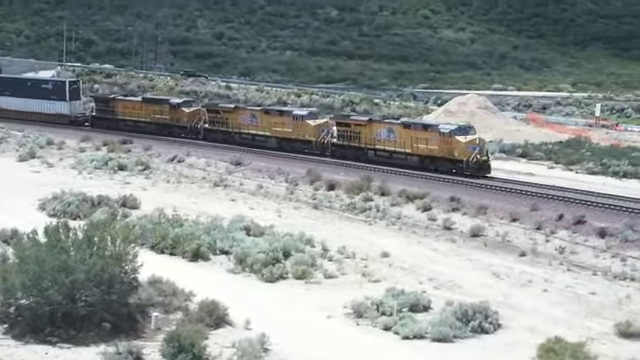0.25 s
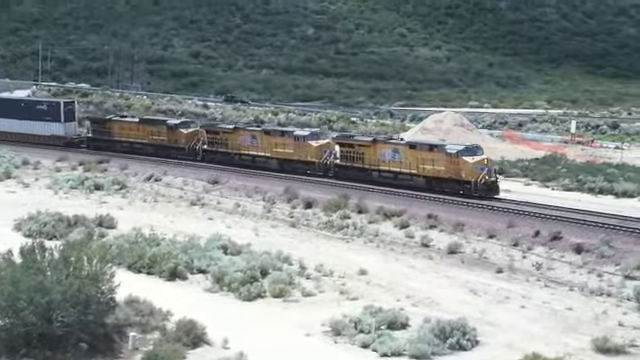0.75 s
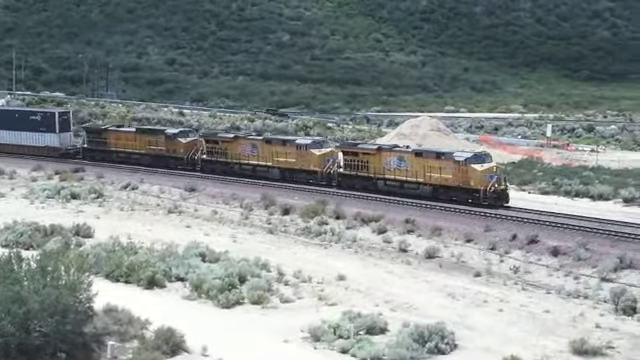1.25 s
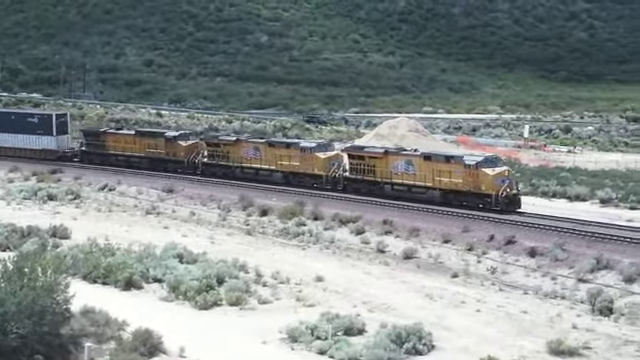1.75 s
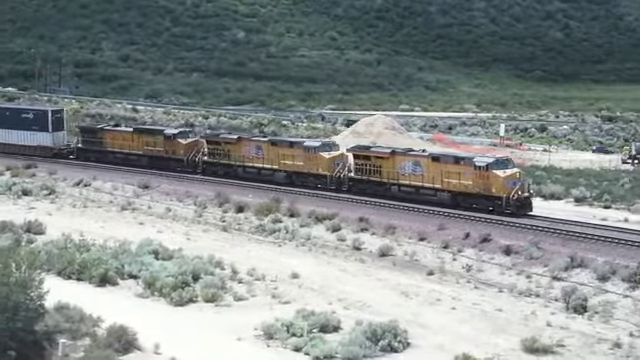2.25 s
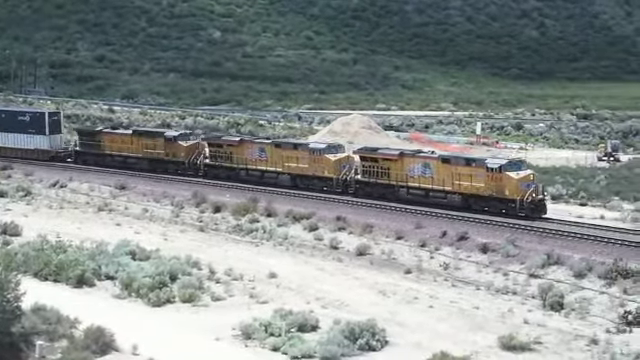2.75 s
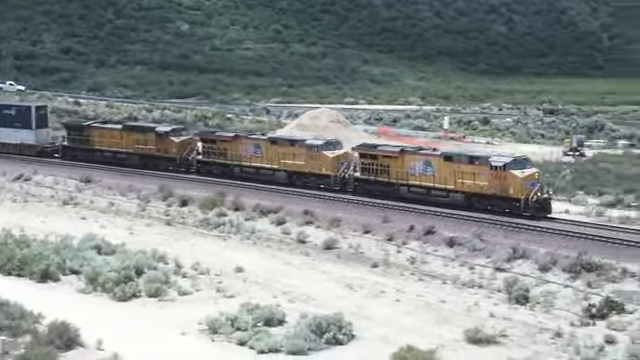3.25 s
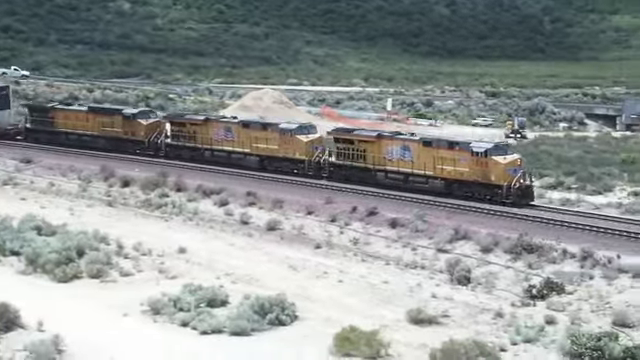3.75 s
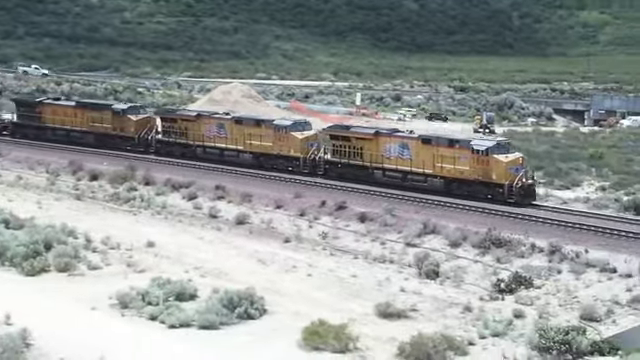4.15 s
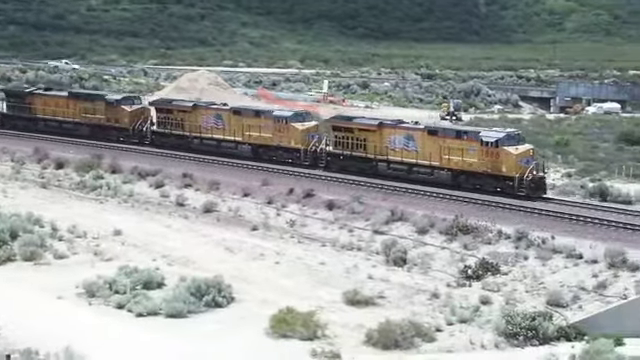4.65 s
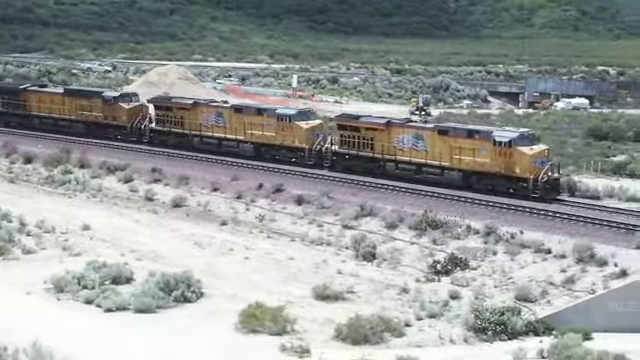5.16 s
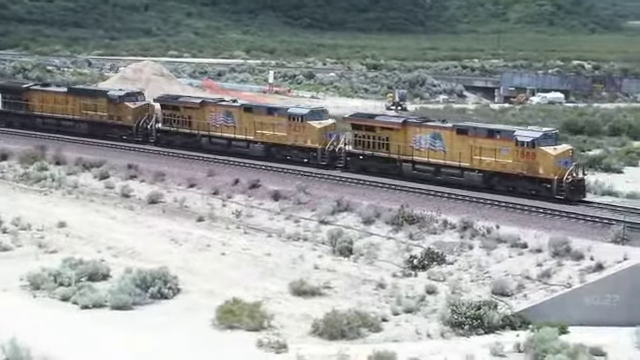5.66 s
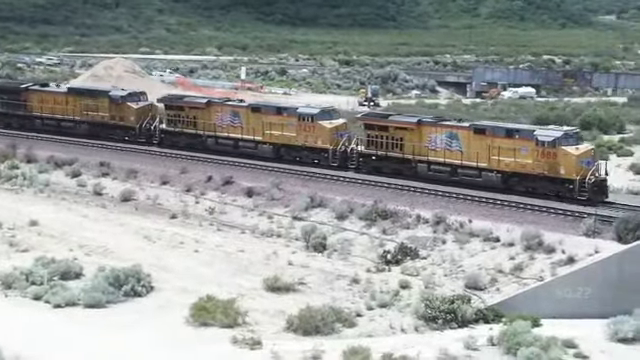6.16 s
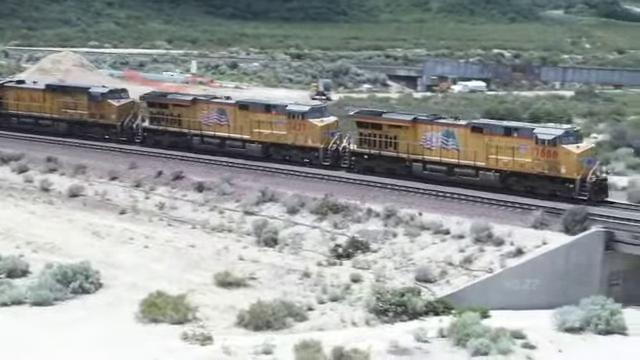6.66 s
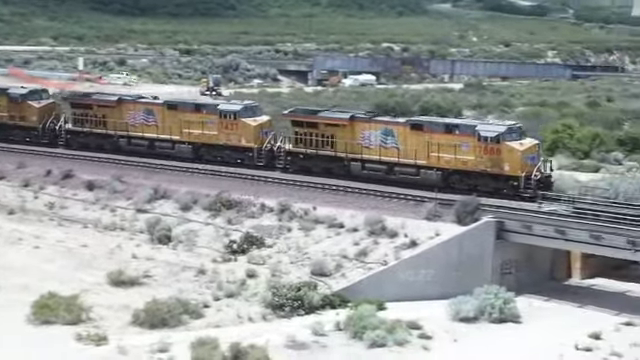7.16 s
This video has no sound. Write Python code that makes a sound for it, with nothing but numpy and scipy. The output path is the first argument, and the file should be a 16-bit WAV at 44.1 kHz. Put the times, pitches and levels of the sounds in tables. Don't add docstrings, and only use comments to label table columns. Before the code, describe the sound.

From a windy open hillside, diesel locomotives work at full throttle, roughly 150 metres away and slowly closing. At 0 s the train is held low beneath strong wind rumble and small port slaps; its low, steady buzzing drone, broad exhaust roar and grainy fan and rail hiss rise by about 1.7-2 s. Hard wind slaps strike near 1.1 and 2.6 s, and heavy gusts at 3.2-3.5 s, each making the train dip and recover. Around 3.6 s one engine's drone gives way to a stronger, throbbing second one; the roar carries best near 4.4 s, and the hum is fullest around 5-6 s. A sharp slap hits at 5.2 s. Wind then eases somewhat, with another flurry near 6.9 s. Thin unsteady fan and turbo whines shimmer above. Gusts are stronger on the left, and the engines continue through the end at about 7.4 s.

```python
import sys
import numpy as np
from scipy import signal
from scipy.fft import rfft, irfft
from scipy.io import wavfile

SR = 44100
rng = np.random.default_rng(int(sys.argv[2]) if len(sys.argv) > 2 else 0)


def log_audio(samples):
    frames = np.atleast_2d(samples).T
    limited = np.clip(frames, -1, 1)
    pcm = np.round(limited * 32767).astype(np.int16)
    wavfile.write(sys.argv[1], SR, pcm)


def undo_db(level):
    steps = np.asarray(level, float) / 20
    return 10 ** steps


N = 326340

CALM_DB = -32

# (time [s], rate [cycles/s])
CRANK_CYCLE = [
    (0, 8.905),
    (7.4, 8.879),
]
# (order of the cycle, first engine level [dB], second engine level [dB])
EXHAUST_ORDERS = [(6, -48, -49), (7, -55, -58), (8, -56, -56), (9, -44, -37), (10, -49, -43),
                  (11, -39, -37), (12, -43, -34), (13, -51, -37), (14, -43, -31), (15, -28, -20),
                  (16, -45, -35), (17, -40, -41), (18, -30, -32), (19, -36, -41), (20, -39, -40),
                  (21, -29, -33), (22, -31, -38), (23, -52, -42), (24, -39, -42), (25, -41, -49),
                  (26, -35, -40), (27, -40, -44), (28, -46, -47), (29, -42, -57), (30, -43, -54),
                  (31, -51, -60), (32, -55, -59)]
STACK_ORDER, STACK_FIRST_DB, STACK_SECOND_DB = 15, 1.3, 2
FACING_S, OFF_AXIS_DB_PER_S2 = 5.75, 1.44
HANDOVER_S, HANDOVER_SPREAD_S, HIDDEN_DB = 3.64, 0.32, -16.5
DISPERSION_RAD = .5
DRONE_FOLLOWS = 0.77


def exhausts(hiss_db, wander_db, wander_rad):
    turn = 2 * np.pi * np.cumsum(in_time(CRANK_CYCLE)[0]) / SR
    t = control_times()
    clear = .5 + .5 * np.tanh((t - HANDOVER_S) / HANDOVER_SPREAD_S)
    first = undo_db(HIDDEN_DB * clear)
    second = undo_db(HIDDEN_DB * (1 - clear))
    beam_db = STACK_SECOND_DB - OFF_AXIS_DB_PER_S2 * (t - FACING_S) ** 2
    out = np.zeros(N)
    for order, first_db, second_db in EXHAUST_ORDERS:
        stack = order == STACK_ORDER
        first_height = first * undo_db(first_db + stack * STACK_FIRST_DB)
        second_height = second * undo_db(second_db + stack * beam_db)
        height = np.hypot(first_height, second_height)
        phase = DISPERSION_RAD * (order - STACK_ORDER) ** 2 + wander_rad * drift(0.79)
        shimmer = undo_db(wander_db * drift(0.68)[::100])
        out += fine(height * shimmer) * np.cos(order * turn + phase)
    return np.sqrt(2) * out * undo_db(DRONE_FOLLOWS * (hiss_db - CALM_DB))


# (frequency [Hz], density [dB per Hz])
ROAR_SPECTRUM = [(24, -53), (40, -30), (82, -8.5), (120, -11), (209, 0), (290, -12), (370, -8), (450, -7),
                 (540, -10.5), (620, -20), (780, -30.5), (1110, -25.5), (1350, -34.5), (1950, -62.5)]
# (frequency [Hz], density [dB per Hz])
HISS_SPECTRUM = [(500, -42), (850, -12.5), (1100, -2.5), (1280, -5.5), (1370, -9), (1480, -5.5),
                 (2140, -2.5), (2650, -8), (3200, -4), (3640, -5.5), (3950, -3), (4970, -12), (6000, -18.5),
                 (7800, -53), (13200, -120)]
# (frequency [Hz], density [dB per Hz])
TOP_SPECTRUM = [(5800, -36), (6050, -28.5), (6300, -8), (6550, -4), (7100, -1.5), (8400, -2.5), (9000, -5),
                (9500, -6), (10200, -12.5), (10450, -21), (11200, -34.5), (11500, -47)]
# (frequency [Hz], density [dB per Hz])
AIR_SPECTRUM = [(11400, -16), (11700, -3.5), (13000, -4), (14000, -11), (15000, -18), (15700, -32)]
# (time [s], level [dB])
CARRY = [
    (0, 0.5),
    (1.3, 0.3),
    (2.2, 0.9),
    (3.5, -0.8),
    (4.0, 0.5),
    (4.4, 3),
    (5.1, -0.7),
    (7.4, -0.7),
]
# (time [s], level [dB])
GLINTS = [(.87, 3.5), (1.13, 1), (1.68, 0.5), (1.88, -2), (2.08, 1), (2.86, 4), (3.4, 1), (3.6, 1),
          (4.12, 2.2), (4.6, -2), (4.86, 3.5), (5.28, -2), (7.28, 2.5)]
GLINT_S, AIR_GLINT_SHARE = .06, .9
ROAR_DB, TOP_DB, AIR_DB = 7, -1.5, -16
DISTANCE_M, CLOSING_M_PER_S = 150, 8
TOP_LOSS_DB_PER_M, AIR_LOSS_DB_PER_M, TOP_SHIMMER_DB = 0.0849, .16, 0.45
ROAR_FOLLOWS, AIR_FOLLOWS = 0.74, .6


def train_noise(hiss_db):
    metres = DISTANCE_M - CLOSING_M_PER_S * np.arange(N) / SR
    s, focus_db = np.transpose(GLINTS)
    glint_db = fine(focus_db @ bells(control_times(), s, GLINT_S))
    over_calm_db = hiss_db - CALM_DB
    white = turbulent_white(shared_db=.5, own_db=.8)

    roar_db = ROAR_DB + in_time(CARRY)[0] - (1 - ROAR_FOLLOWS) * over_calm_db
    roar = undo_db(roar_db) * colour(white, ROAR_SPECTRUM)

    hiss = undo_db(-0.23) * colour(white, HISS_SPECTRUM) * undo_db(np.array([[-.4], [.4]]))
    top_db = TOP_DB - TOP_LOSS_DB_PER_M * metres + glint_db + TOP_SHIMMER_DB * drift(4.0)
    top = undo_db(top_db) * colour(white, TOP_SPECTRUM) * undo_db(np.array([[.5], [-.5]]))

    air_db = AIR_DB - AIR_LOSS_DB_PER_M * metres + AIR_GLINT_SHARE * glint_db
    air_db = air_db - (1 - AIR_FOLLOWS) * over_calm_db
    air = undo_db(air_db) * colour(white, AIR_SPECTRUM)
    return undo_db(hiss_db) * (roar + hiss + top + air + whines())


# (frequency [Hz], width [Hz], level over hiss [dB])
WHINES = [
    (423, 8, -8.5),
    (1135, 14, -18),
    (1270, 6, -19),
    (1513, 8, -22.5),
    (2117, 16, -20),
    (4031, 30, -22.5),
    (4855, 60, -20.5),
    (6660, 90, -22),
    (8450, 60, -29),
    (9200, 60, -31),
]


def whines():
    out = np.zeros(N)
    for hz, width_hz, level_db in WHINES:
        r = np.exp(-np.pi * width_hz / SR)
        poles = [1, -2 * r * np.cos(2 * np.pi * hz / SR), r * r]
        once = signal.lfilter([1, 0, -1], poles, rng.standard_normal(2 * N))
        tone = signal.lfilter([1], poles, once)[N:]
        out += undo_db(level_db + 2.8 * drift(1.1)) * rms_one(tone)
    return out


# (frequency [Hz], left-right likeness [0-1])
LIKENESS = [(60, 1), (500, 0.98), (1200, 0.91), (2200, 0.96), (4000, 0.57), (5500, 0.79), (8000, 0.48),
            (13000, 0.33)]


def turbulent_white(shared_db, own_db):
    out, together = 0, drift(9.0)
    edges = 35 * 2 ** np.arange(0, 9.1, .5)
    white = rng.standard_normal((2, 2, N))
    for k, (low, high) in enumerate(zip(edges, edges[1:])):
        band = signal.butter(2, [low, high], "band", fs=SR, output="sos")
        mid, side = signal.sosfilt(band, white[k % 2])
        alike = np.clip(at_hz(LIKENESS, np.sqrt(low * high)), 0, 1)
        gain = undo_db(min(low / 1500, 1) * shared_db * together + own_db * drift(8.2))
        out = out + gain * (np.sqrt(1 + alike) * mid + np.sqrt(1 - alike) * side * [[1], [-1]])
    return out


# (time [s], hiss level [dB])
TRAIN_LEVEL = [(0, -37), (.86, -33.5), (1.45, -32.5), (1.68, -29), (1.9, -28), (2.3, -30.5), (2.58, -30),
               (3.2, -29.3), (3.73, -29), (4.2, -31.5), (4.5, -33), (4.85, -33.5), (5.2, -32), (5.9, -31.5),
               (6.8, -31.5), (7.4, -31.5)]
# (time [s], depth [dB], recovery [s])
DUCKS = [(.89, 2.1, .5), (1.125, 4, 0.058), (1.22, 4, 0.16), (1.7, 3, 0.095), (1.97, 1.5, 0.23),
         (2.62, 5.5, 0.65), (3.241, 6.5, 0.11), (3.419, 5.5, 0.28), (4.26, 2.5, 0.063), (4.51, 2, 0.24),
         (4.68, 2.2, 0.12), (4.86, 5, 0.22), (5.24, 3.5, 0.48), (5.95, 2, 0.37), (6.85, 4.5, 0.39)]
DUCK_ATTACK_S = 0.048


def train_db():
    t = control_times()
    s, depth_db, recovery_s = np.transpose(DUCKS)[:, :, None]
    fall = np.clip((t - s) / DUCK_ATTACK_S, 0, 1)
    back = np.clip((t - s - DUCK_ATTACK_S) / recovery_s, 0, 1)
    ducks_db = depth_db * fall * np.cos(np.pi * back / 2) ** 2
    return in_time(TRAIN_LEVEL)[0] - fine(ducks_db.sum(axis=0))


# (time [s], level [dB], port [1 left, -1 right])
SLAPS = [(0.028, -25, -1), (0.052, -28, 1), (0.315, -28, -1), (0.478, -28, 1), (2.724, -26, 1),
         (0.596, -25, 1), (0.634, -25, -1), (0.713, -24, 1), (0.727, -25, -1), (1.011, -26, 1),
         (1.124, -14.5, -1), (1.169, -27, 1), (1.208, -29, -1), (1.238, -22, 1), (2.634, -18.5, 1),
         (2.681, -22, 1), (2.784, -26.5, 1), (2.871, -27.5, 1), (3.224, -32, -1), (3.436, -23, 1),
         (4.383, -21, -1), (4.689, -25, 1), (4.891, -28, 1), (5.215, -23.5, -1), (5.238, -14, 1),
         (5.523, -30, 1), (5.903, -22, -1), (6.881, -26, 1), (6.9, -24, -1), (6.921, -24, -1)]
# (frequency [Hz], density [dB per Hz])
SLAP_SPECTRUM = [(40, -25), (100, 3), (200, 11), (350, 10), (550, 5), (740, -3), (980, 6), (1250, -3),
                 (2000, -12), (3500, -36)]


def slaps(spread_s, boost_db):
    clicks, click = np.zeros((2, N)), np.zeros(N)
    chance = rng.uniform(-1, 1, (len(SLAPS), 7))
    for (s, level_db, port), draw in zip(SLAPS, chance):
        at = ((s + 0.00208 + spread_s * np.r_[0, draw[:3]]) * SR).astype(int)
        heights = np.r_[np.sign(draw[3]), .65 * draw[4:]]
        clicks[int(port < 0), at] += undo_db(level_db + boost_db) * heights
    click[N // 2] = 1
    shape = colour(click, SLAP_SPECTRUM)[N // 2 - 2000:N // 2 + 2001]
    return signal.fftconvolve(clicks, shape[None] / shape.max(), "same", axes=1)


FLINCH_DB, FLINCH_S, HARD_SLAP_DB = 5, .02, -16


def flinch():
    s, level_db, _ = np.transpose(SLAPS)[:, :, None]
    since = (control_times() - s) / FLINCH_S
    shape = (since > 0) * np.exp(-np.maximum(since, 0) ** 2)
    dips_db = FLINCH_DB * undo_db(level_db - HARD_SLAP_DB) * shape
    return undo_db(-fine(dips_db.sum(axis=0)))


# (time [s], half length [s], left level [dB], right port below left [dB])
GUSTS = [(0.026, 0.086, -20, -0.5), (.22, 0.19, -17.5, 5.5), (.48, 0.12, -20, 5), (.7, 0.16, -20.5, 0),
         (0.917, .12, -18, 6), (1.15, 0.14, -20.5, 4), (1.29, 0.071, -21, 5), (1.45, 0.073, -19.5, 9),
         (1.66, 0.047, -22, 4), (1.86, .1, -28, 9), (2.36, 0.11, -20, 7), (2.72, .18, -19.5, 11),
         (3.0, 0.13, -21.5, 6), (3.26, 0.046, -16.5, 4), (3.445, 0.13, -16.5, 6.5),
         (3.633, 0.085, -21.5, 7), (3.797, 0.1, -22.5, .3), (4.02, 0.074, -23, 4), (4.35, 0.092, -28, 0),
         (4.55, 0.14, -21.5, 7), (4.715, 0.075, -21.5, 4), (4.9, 0.056, -20, 11), (5.06, 0.054, -22, 5),
         (5.27, 0.17, -19, 10), (5.5, 0.086, -21.5, 6.5), (5.94, .13, -23.5, 4), (6.17, .07, -25, 3),
         (6.68, 0.11, -25, 6), (6.89, 0.058, -21, 0), (7.25, .1, -27, 12)]
# (frequency [Hz], density [dB per Hz])
BUFFET_SPECTRUM = [(20, -18), (45, -7.5), (90, 0), (200, -3), (300, -6.5), (400, -13), (520, -19),
                   (620, -29), (800, -33), (1000, -32), (1500, -44), (3000, -60)]
BREEZE_LEFT_DB, BREEZE_RIGHT_DB = -31.5, -39


def wind(lumpy_db):
    s, half_s, left_db, lee_db = np.transpose(GUSTS)
    gusts = undo_db([left_db, left_db - lee_db])
    power = gusts ** 2 @ bells(control_times(), s, half_s) ** 2
    left, right = np.sqrt(power + undo_db([[BREEZE_LEFT_DB], [BREEZE_RIGHT_DB]]) ** 2)
    lumps = undo_db(lumpy_db * np.array([drift(20.7), drift(13.4)]))
    buffet = colour(rng.standard_normal((2, N)) * lumps, BUFFET_SPECTRUM)
    return undo_db(0.9) * np.array([fine(left), fine(right)]) * buffet


def rms_one(x):
    return x / np.sqrt(np.mean(x ** 2) + 1e-20)


def in_time(rows):
    s, *columns = np.transpose(rows)
    return [np.interp(np.arange(N) / SR, s, c) for c in columns]


def at_hz(points, hz):
    table_hz, values = np.transpose(points)
    return np.interp(np.log(hz), np.log(table_hz), values)


def colour(x, spectrum):
    hz = np.arange(1, N // 2 + 2) * SR / N
    inside = (hz > spectrum[0][0]) & (hz < spectrum[-1][0])
    return rms_one(irfft(rfft(x) * undo_db(at_hz(spectrum, hz)) * inside, N))


def drift(rate):
    r = np.exp(-80 * np.pi * rate / SR)
    slow = signal.lfilter([1], [1, -2 * r, r * r], rng.standard_normal(N // 40 + 2002))[2000:]
    return np.interp(np.arange(N) / 40, np.arange(len(slow)), rms_one(slow))


def bells(t, s, half_s):
    return np.exp(-((t - s[:, None]) / np.reshape(half_s, (-1, 1))) ** 2)


def control_times():
    return np.arange(0, N, 100) / SR


def fine(coarse):
    return np.interp(np.arange(N) / 100, np.arange(len(coarse)), coarse)


def scene():
    hiss_db = train_db()
    drone = exhausts(hiss_db, wander_db=1.0, wander_rad=.25) * undo_db(np.array([[.2], [-.2]]))
    bed = drone + train_noise(hiss_db) + wind(lumpy_db=4.2)
    return bed * flinch() + slaps(spread_s=.011, boost_db=17.0)


def low_pass(x):
    return signal.sosfilt(signal.butter(12, 15700, fs=SR, output="sos"), x)


PORT_NOTCH_HZ, PORT_NOTCH_WIDTH_HZ, PORT_NOTCH_DB = 5960, 140, -8


def record(dry):
    hz = np.arange(N // 2 + 1) * SR / N
    dip = undo_db(PORT_NOTCH_DB * np.exp(-((hz - PORT_NOTCH_HZ) / PORT_NOTCH_WIDTH_HZ) ** 2))
    heard = irfft(rfft(dry) * dip, N)
    limited = heard / (1 + np.abs(heard / .46) ** 4) ** .25
    return low_pass(limited)


dry = scene()
out = record(dry)
log_audio(out)
```